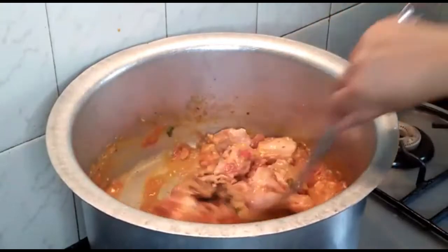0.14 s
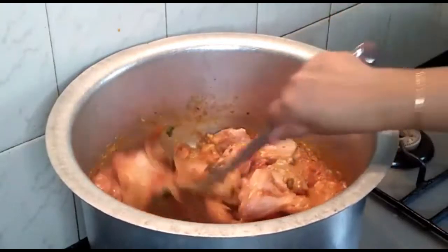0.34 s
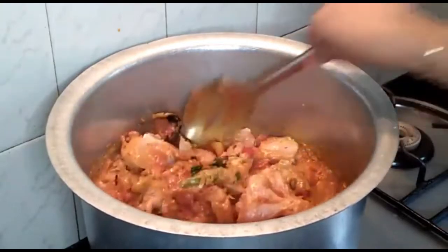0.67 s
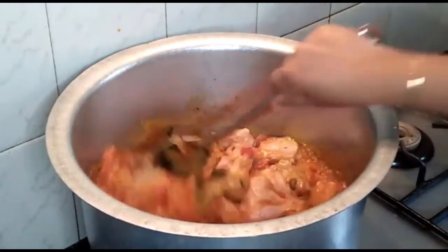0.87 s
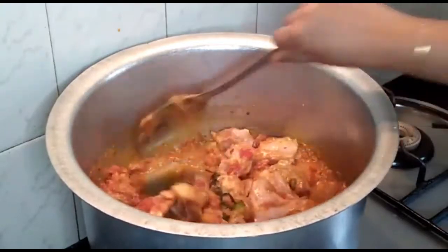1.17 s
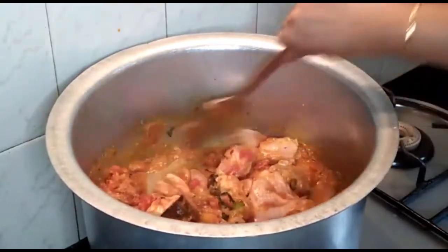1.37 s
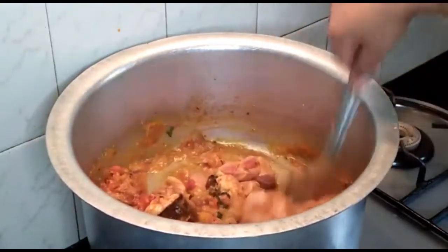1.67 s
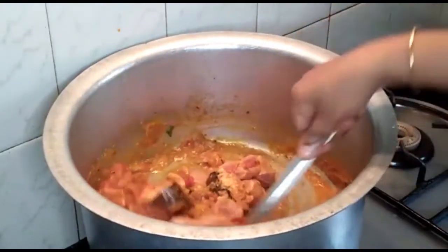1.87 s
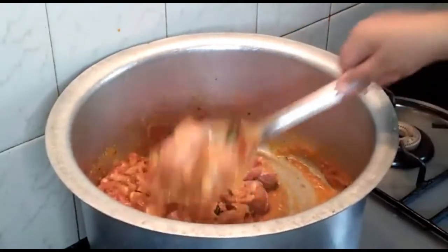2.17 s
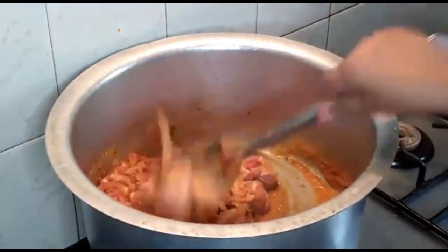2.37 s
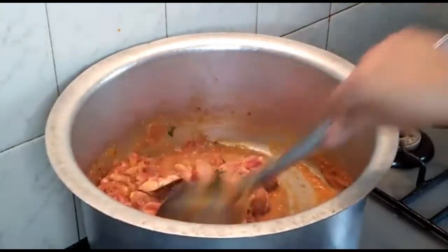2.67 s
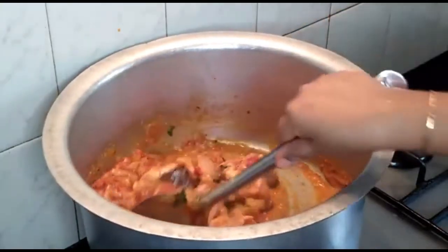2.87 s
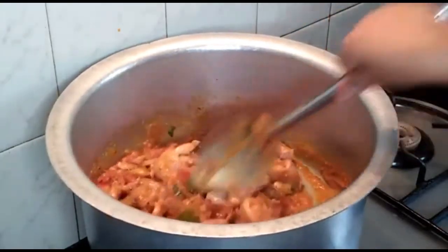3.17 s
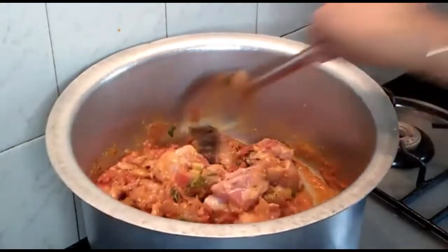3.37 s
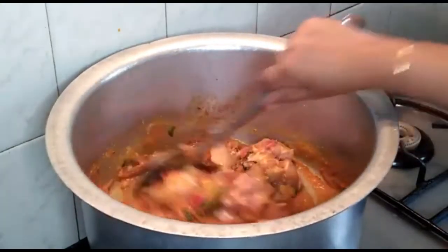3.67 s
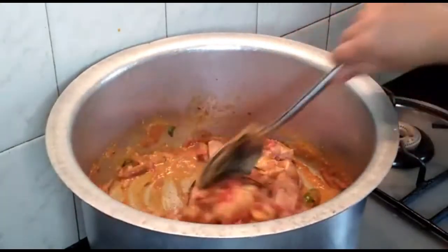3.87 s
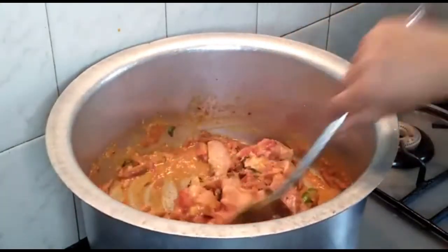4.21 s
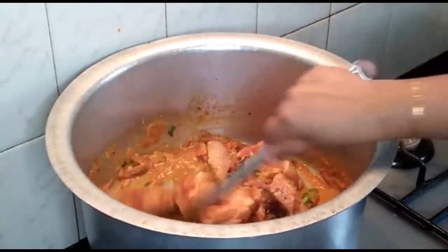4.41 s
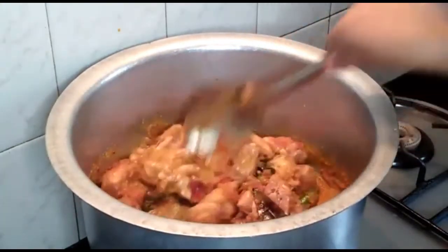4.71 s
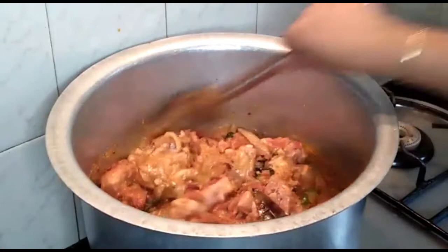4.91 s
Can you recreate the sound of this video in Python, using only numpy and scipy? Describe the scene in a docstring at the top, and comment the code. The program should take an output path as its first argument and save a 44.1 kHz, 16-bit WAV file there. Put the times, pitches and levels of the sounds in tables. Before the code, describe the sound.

A metal ladle stirs thick food in a large aluminium pot. Soft scrapes and hissy sizzle come first, then a sharp clank midway leads into the loudest run of grating scrapes. Lighter scrapes and knocks follow, with quiet gaps, and a last scrape with a strong sizzle near the end. A thin bangle ticks brightly. Close microphone, small tiled kitchen, nearly mono, very faint fan hum.

```python
"""Ladle stirring a pot

A metal ladle stirs food in a large aluminium pot on a gas ring in a tiled kitchen, over a faint fan hum. Its
edge scrapes (uneven clicks through pot modes) and knocks (chattering hits on the same modes). The bare bottom
sizzles and ticks (clicks and short cracks of noise); a thin bangle rings on the wrist. A diffuse echo surrounds
it all. The sound is nearly mono; only the treble carries a faint, smeared side signal."""
import sys
import numpy as np
from scipy import signal
from scipy.fft import rfft, irfft, next_fast_len
from scipy.io import wavfile

SR = 44100
rng = np.random.default_rng(int(sys.argv[2]) if len(sys.argv) > 2 else 0)


def dump_mix(stems):
    """Bounce the given channels to the path in sys.argv[1] as a 16-bit WAV at rate SR."""
    frames = np.atleast_2d(stems).T  # one column per channel
    limited = np.clip(frames, -1, 1)  # hard clip at full scale
    pcm = np.round(limited * 32767).astype(np.int16)
    wavfile.write(sys.argv[1], SR, pcm)


N = 222693

# Room air, relative spectrum: pitch_hz, level_db
AIR_SPECTRUM = [(19, -22), (33, -1.5), (49, -13), (226, -13), (385, -6.5), (436, -6), (654, -5),
                (822, -1.5), (1060, -8), (4050, -26), (6230, -49.5), (9340, -33), (14000, -25)]
AIR_RMS_DB = -73.5
# Fan motor partials: pitch_hz, level_db (centre of its wavering)
FAN_PARTIALS = [(96.9, -91), (441.4, -75), (538.3, -76)]
# Sizzle of the bare hot bottom as food covers and uncovers it: time_s, level_db
FRYING_LEVEL = [(0, -58), (.1, -56), (.125, -53), (.22, -68), (.34, -61), (.69, -58.5), (.8, -60.5),
                (.87, -87), (1.0, -67.5), (1.097, -47), (1.27, -63.5), (1.5, -68.5), (1.54, -78),
                (2.06, -58), (2.27, -57), (2.43, -77.5), (2.94, -78), (3.3, -55), (3.52, -77), (3.6, -118),
                (3.72, -76), (3.8, -67), (4.35, -72), (4.8, -44), (4.955, -60), (5.03, -91)]
# Tone of the sizzle, relative spectrum: pitch_hz, level_db
SIZZLE_SPECTRUM = [(3410, -25.5), (5800, -20), (6500, -7.5), (8920, 2), (9480, 3.5), (13500, -10),
                   (14400, 0.5)]
# Dry ticks of spitting fat and first metal contacts:
# start_s, level_db (relative), centre_hz, width (ratio)
FAT_AND_METAL_TICKS = [(0.3094, -42, 8450, 1.2), (0.3495, -49, 8950, 3.6), (1.4894, -55, 2680, 1.7),
                       (1.5512, -28, 5400, 0.83), (1.6478, -23, 7000, 2.5), (2.7, -45, 2850, 2),
                       (2.7726, -56.5, 2920, 0.99), (2.8843, -51, 2840, 1.5), (2.913, -53.5, 2910, 1.4),
                       (2.9472, -32, 9300, 0.83), (3.0473, -31, 9500, 0.71), (3.648, -66, 9000, 0.98),
                       (3.6895, -25.5, 12460, 1.22), (3.7322, -29, 2510, 1.18), (4.135, -41, 9900, 0.82),
                       (4.3834, -64, 8700, 2.2), (4.52, -49, 5230, 1.6)]
# Bangle touches: start_s, level_db (relative), strongest_ring_hz, chatter_t60_s,
# damping by the wrist (factor; below 1 acts as 1)
BANGLE_TOUCHES = [(0.11, -28, 10800, 0.058, 0.65), (0.1176, -38, 10300, 0.024, 0.67),
                  (0.35, -29.5, 10500, 0.018, 0.86), (0.6357, -32.5, 10100, 0.021, 0.78),
                  (1.0375, -50, 8700, 0.03, 1.3), (1.5518, -21.5, 5840, 0.19, 14),
                  (1.6467, -24, 9500, 0.038, 2.2), (2.2833, -40, 9900, 0.015, 1.1),
                  (2.443, -47, 9400, 0.029, 0.8), (2.5894, -60, 9240, 0.01, 1.6),
                  (2.9472, -51, 9000, 0.025, 1.1), (2.9617, -29.5, 10200, 0.059, 0.58),
                  (3.0472, -36, 9700, 0.021, 2), (3.0677, -34.5, 9700, 0.03, 1.16),
                  (3.1844, -25, 11300, 0.094, 1.4), (3.2506, -26.5, 9500, 0.021, 2),
                  (3.3588, -33.5, 9500, 0.2, 1.2), (3.487, -42.5, 9100, 0.01, 1),
                  (3.6514, -43.5, 8450, 0.03, 3.4), (4.596, -47, 9700, 0.033, 1.6)]
# Ringing modes of the bangle: pitch_hz, level_db, t60_s (undamped)
BANGLE_MODES = [(6350, -9, .1), (6713, -8, .06), (7300, -8, .08), (8027, -6, .1), (8775, 0, .12),
                (9300, -3, .1), (9900, -3, .08), (10240, -2, .12), (10850, -4, .08), (11400, -7, .06),
                (12030, -5, .06), (12300, -7, .08), (13100, -8, .08), (14000, -10, .08)]
# Ladle landing on the pot: start_s, level_db (relative), centre_hz, chatter_t60_s, width (ratio)
LADLE_KNOCKS = [(0.0, -58, 940, 0.24, 0.82), (0.274, -63, 2230, 0.038, 0.87),
                (0.36, -43.5, 980, 0.053, 0.92), (0.556, -36.5, 860, 0.079, 1.14),
                (0.99, -54.5, 2790, 0.084, 1.12), (1.139, -47, 900, 0.37, 1.18),
                (1.551, -18, 737, 0.025, 1.08), (1.554, -28.5, 460, 0.065, 1.21),
                (1.647, -27.5, 740, 0.21, 1.4), (1.847, -28, 1400, 0.019, 1.23),
                (1.951, -38, 1820, 0.17, 1.26), (2.03, -30.5, 1340, 0.12, 1.18),
                (2.192, -46.5, 704, 0.27, 6.3), (2.246, -34, 910, 0.027, 9.1),
                (2.301, -49, 2800, 0.04, 0.82), (2.316, -39.5, 666, 0.037, 4.1),
                (2.435, -47, 990, 0.13, 1.2), (2.469, -52, 3300, 0.092, 0.74),
                (3.165, -49, 305, 0.14, 1.12), (3.178, -40, 1630, 0.13, 1.17),
                (3.254, -55, 1300, 0.03, 0.86), (3.3, -44.5, 438, 0.29, 1.08),
                (3.733, -41.5, 2480, 0.18, 0.96), (4.389, -73, 2720, 0.05, 1.3),
                (4.517, -48.5, 5100, 0.082, 0.94), (4.531, -62, 110, 0.021, 1.3),
                (4.597, -46.5, 810, 0.15, 2.6), (4.694, -53, 710, 0.056, 0.97)]
# Ringing modes of the pot: pitch_hz, level_db, t60_s (undamped)
POT_MODES = [(285, -17, .15), (307, -17, .2), (433, -9, .2), (483, -10, .2), (560, -13, .12),
             (637, -11, .15), (717, -3, .18), (754, -2, .18), (785, -5, .15), (833, -2, .18),
             (925, -7, .15), (1000, -9, .15), (1075, -9, .12), (1218, -6, .13), (1295, -11, .13),
             (1410, -10, .12), (1485, -14, .12), (1600, -14, .12), (1810, -13, .12), (2035, -16, .1),
             (2180, -14, .1), (2355, -14, .1), (2585, -17, .1), (2790, -18, .1), (3140, -17, .08),
             (3540, -22, .08), (3970, -20, .08), (4800, -24, .06), (5280, -21, .06)]
# Crowded pot modes under the scrape, relative spectrum: pitch_hz, level_db
RUMBLE_SPECTRUM = [(59, -23.5), (100, -15.5), (172, -28.5), (282, -8), (372, -24), (430, 4.5), (542, -1.5),
                   (824, 12), (1400, -17), (1820, -32.5), (3080, -120)]
# Centres of the low pot groups that swell separately: pitch_hz
LOW_GROUP_CENTRES = 300, 400, 530, 700, 920
# Strokes of the ladle's edge: start_s, rise_s, hold_s, rasp_db, swell_db (over the hold), fade_t60_s,
# rasp_from_hz, rasp_to_hz, skirt (breadth around the rasp pitch, 0-1),
# then against the rasp: rumble_db, grit_db, sizzle_db (stirred up)
LADLE_STROKES = [ (0.0, .001, 0.0043, -69.5, -0.5, 0.84, 1400, 1700, .8, -5, -2.5, 7),
                 (0.27, 0.019, 0.027, -69, 0, .3, 1990, 1900, .8, -4, -16, -5),
                 (0.342, 0.036, .2, -51, 3, 0.34, 1330, 1600, 1, 1, -5.5, 3),
                 (0.68, .02, 0.086, -72.5, 1, 0.2, 1420, 1480, 1, -3, -1, -6),
                 (0.968, 0.011, 0.18, -69, 6.5, .2, 2480, 1560, 1, -1, -5, 4),
                 (1.095, 0.033, 0.06, -52.5, 3.5, .24, 1400, 1590, 1, -6, -10, -2.5),
                 (1.258, 0.11, 0.15, -59, -5.5, 0.15, 1880, 2150, 0.04, -15, -26, -8),
                 (1.544, 0.0061, 0.011, -31, 1, 0.29, 1226, 1225, 0.18, 2, -19, -14.5),
                 (1.648, 0.0012, 0.12, -35.5, -4.5, 0.14, 1400, 1960, 1.0, -1.5, -6.5, -1),
                 (1.745, 0.038, 0.11, -39, 7.5, .2, 1360, 1450, 0.8, -7, -7.5, -8.5),
                 (1.886, 0.063, 0.095, -30.5, -9, 0.41, 1800, 1350, 1.0, -6, -9, -9),
                 (2.188, 0.0051, 0.018, -42, 0, 0.23, 1300, 1310, 1, 3, -11, -11.5),
                 (2.238, 0.044, 0.021, -53.5, -0.5, 0.33, 1200, 1244, .6, 9, -10.5, 6),
                 (2.437, .006, 0.039, -51.5, -4.5, 0.23, 1300, 1490, .3, 3.5, -13, -0.5),
                 (2.593, 0.02, 0.013, -72.5, 0, 0.36, 1660, 1890, .6, -1, 0.5, 15.5),
                 (2.945, 0.0022, 0.094, -69, -1, 0.12, 2000, 2157, 0.6, -1.5, -15, 20.5),
                 (3.022, 0.045, 0.096, -67, 5.5, .15, 1500, 1410, .8, 2, -10, 12.5),
                 (3.169, 0.011, 0.039, -41.5, -1.5, 0.26, 1380, 1300, 1, 1, -7, -5.5),
                 (3.233, 0.028, 0.082, -41.5, -8, .45, 1240, 1330, 0.4, 4.5, -17.5, 3.5),
                 (3.649, 0.066, 0.012, -72, 3.5, 0.6, 1500, 2100, 0.4, -11.5, 4, 14.5),
                 (3.729, .006, 0.04, -49, -7, 0.085, 1510, 1500, 0.5, -30, -26, -11),
                 (3.789, 0.098, 0.013, -63.5, -2.5, 1, 2000, 1690, .6, -0.5, 0, 12),
                 (4.095, 0.1, 0.0067, -81.5, -3.5, 0.56, 1570, 1550, 1, -12, 0, 21),
                 (4.379, 0.01, 0.075, -68.5, -0.5, 0.16, 2600, 1530, 1, -2, -0.5, 13.5),
                 (4.501, 0.039, .01, -66, -1, .35, 2640, 2400, 1, -3, 0.5, 1),
                 (4.595, 0.0071, .075, -52.5, 5.5, 0.11, 2210, 2250, 1, -1.5, -4, 1),
                 (4.68, 0.0093, 0.07, -42, -1.5, 0.38, 1913, 1670, 1.0, -2, -5.5, -3), ]
# Tone of the side signal made from the mid: pitch_hz, level_db
SIDE_SPECTRUM = [(3000, -68.5), (4500, -51.5), (7000, -6.5), (15500, -41.5)]

RISE_FROM_DB = -13   # a stroke sets in this far under its level
# food sliding between strokes: (rumble, rasp, grit) levels, rasp pitch, skirt
REST_DB, REST_HZ, REST_SKIRT = (-95, -82, -84), 1414, 1
# harder strokes reach lower: dB per octave gained for each dB of rumble above the threshold
DEEPEN_FROM_DB, DEEPEN_RATE = -44.5, 0.3
LONGEST_RING_S = .2
KITCHEN_T60_S, KITCHEN_DB = 0.37, -9.5
MIC_TOP_HZ, CUTOFF_HZ = 14350, 15600


def from_db(db):
    """Decibels to gain."""
    return 10 ** (np.asarray(db) / 20)


def rms_one(x):
    """Scale to rms 1."""
    return x / np.sqrt(np.mean(x ** 2) + 1e-20)


def colour(x, spectrum):
    """Filter by a spectrum table, heading outside it for -90 dB at 5 Hz and -70 dB at the top."""
    hz, db = np.transpose([(5, -90), *spectrum, (SR / 2, -70)])
    size = next_fast_len(N)
    log_grid = np.log(np.arange(size // 2 + 1) * SR / size + 1)
    gain = from_db(np.interp(log_grid, np.log(hz), db))
    return irfft(rfft(x, size) * gain, size)[:N]


def band(x, hz, spread):
    """Band-pass from hz / spread to hz * spread, with spread at least 1.1."""
    spread = max(spread, 1.1)
    edges = [hz / spread, min(hz * spread, .45 * SR)]
    return signal.sosfilt(signal.butter(2, edges, "band", fs=SR, output="sos"), x)


def drift(rate_hz):
    """Slow random wander of rms 1: noise through a double low-pass."""
    r = np.exp(-2 * np.pi * rate_hz / SR)
    wander = signal.lfilter([1], [1, -2 * r, r * r], rng.standard_normal(N + SR))
    return rms_one(wander[SR:])   # drop the filter's settling


def ring(force, modes, damping=1.0, spread_db=0.0):
    """A force sets decaying modes ringing; the contact point favours some modes over others."""
    t = np.arange(SR // 4) / SR
    favour = rng.standard_normal(len(modes)) * spread_db
    body = np.zeros(len(t))
    for (hz, db, t60), own_db in zip(modes, favour):
        fade_db = -60 * t * damping / min(t60, LONGEST_RING_S)
        body += from_db(db + own_db + fade_db) * np.sin(2 * np.pi * hz * t)
    return signal.fftconvolve(force, body)


def grains(per_s, uneven_db):
    """Random clicks of uneven size and either sign; rms 1."""
    sizes = from_db(uneven_db * np.minimum(rng.exponential(1, N), 4)) * rng.choice([-1, 1], N)
    return rms_one(sizes * (rng.random(N) < per_s / SR))


def chatter(t60, per_s):
    """A first contact followed by quick, fading rebounds."""
    t = np.arange(SR // 10) / SR
    rebounds = rng.standard_normal(len(t)) * (rng.random(len(t)) < per_s / SR)
    force = rebounds * from_db(-60 * t / max(t60, .002))
    force[0] = 1.45
    return force


def add(out, start_s, peak_db, sound):
    """Mix a sound in at a time and peak level."""
    part = out[round(start_s * SR):][:len(sound)]
    part += from_db(peak_db) * sound[:len(part)] / np.abs(sound).max()


def background():
    """Room air as coloured noise, and the slightly wavering hum of a fan motor as sine partials."""
    t = np.arange(N) / SR
    hum = np.zeros(N)
    for hz, db in FAN_PARTIALS:
        hum += from_db(db + 3.3 * drift(7)) * np.sin(2 * np.pi * hz * t + 0.2 * drift(13.0))
    air = rms_one(colour(rng.standard_normal(N), AIR_SPECTRUM))
    return hum + from_db(AIR_RMS_DB) * air


def kitchen(x):
    """Diffuse echo of the tiled walls: fading noise that starts after 6 ms."""
    t = np.arange(SR // 2) / SR
    tail = rng.standard_normal(len(t)) * from_db(-60 * t / KITCHEN_T60_S) * (t > .006)
    return signal.fftconvolve(x, tail / np.linalg.norm(tail))[:N]


def sizzle(level_db):
    """Thousands of tiny steam bursts a second on the hot bottom, with a fluttering level."""
    bursts = rms_one(colour(grains(9000, 0.83), SIZZLE_SPECTRUM))
    return from_db(level_db + 2.54 * drift(21)) * bursts


def ticks():
    """Each tick is a few milliseconds of band-limited crack."""
    out = np.zeros(N)
    for start_s, level_db, hz, spread in FAT_AND_METAL_TICKS:
        add(out, start_s, level_db - 4, band(chatter(.014, 9000), hz, spread))
    return out


def jingles():
    """Each touch is a bright tick and a short ring of the bangle modes near its strongest one."""
    out = np.zeros(N)
    for start_s, level_db, hz, t60, damping in BANGLE_TOUCHES:
        force = chatter(t60, 1000)
        sound = band(ring(force, BANGLE_MODES, max(damping, 1), 3.0), hz, 1.4)
        sound[:len(force)] += 1.1 * band(force, 14000, 3.5)   # the bright tick
        add(out, start_s, level_db, sound)
    return out


def knocks():
    """The ladle's landing chatters on the pot, heard in a band of modes set for each contact."""
    out = np.zeros(N)
    for start_s, level_db, hz, t60, spread in LADLE_KNOCKS:
        rung = ring(chatter(t60, 1500), POT_MODES, 1.1, 3.0)
        add(out, start_s, level_db + 3, band(rung, hz, spread))
    return out


def strokes():
    """Each stroke rises, swells or sags while held, then fades; powers add and the loudest leads the pitch."""
    t = np.arange(0, N + 32, 32) / SR   # one control point every 32 samples
    rest = from_db(REST_DB) ** 2
    frying = from_db(np.interp(t, *np.transpose(FRYING_LEVEL))) ** 2
    # rows: rumble, rasp, grit, sizzle
    power = np.outer([*rest, 0], np.ones_like(t)) + np.outer([0, 0, 0, 1], frying)
    # pitch and skirt are averages weighted by rasp power
    pitch, broad = rest[1] * np.log(REST_HZ), rest[1] * REST_SKIRT
    for (start_s, rise, hold, rasp_db, swell_db, t60, from_hz, to_hz, skirt,
         rumble_db, grit_db, sizzle_db) in LADLE_STROKES:
        turns = start_s + np.cumsum([0, max(rise, 1e-3), max(hold, 1e-3), 2 * max(t60, .02)])
        shape_db = np.interp(t, turns, [RISE_FROM_DB, 0, swell_db, swell_db - 120])
        own = (t >= start_s) * from_db(rasp_db + shape_db) ** 2
        power += np.outer(from_db([rumble_db, 0, grit_db, sizzle_db]) ** 2, own)
        pitch = pitch + own * np.interp(t, turns[1:3], np.log([from_hz, to_hz]))
        broad = broad + own * skirt
    rumble_db, rasp_db, grit_db, sizzle_db = 10 * np.log10(power)
    rasp_hz = np.exp(pitch / power[1])
    controls = rumble_db, rasp_db, rasp_hz, broad / power[1], grit_db, sizzle_db
    return [np.interp(np.arange(N) / SR, t, c) for c in controls]


def glide(pot, slips, centres, peak_hz, skirt, ringing):
    """Groups of modes, strongest near a moving pitch; each also swells as the contact point wanders."""
    out, power = np.zeros(N), np.zeros(N)
    for hz in centres:
        octaves = np.log2(hz / peak_hz)
        peak = from_db(-9 * (octaves / .22) ** 2)
        near = peak + np.clip(skirt, 0, 1) * from_db(3 - 4 * np.abs(octaves))
        near *= from_db(2.5 * drift(9))
        rung = rms_one(band(pot, hz, 1.1))
        rough = rms_one(band(rng.permutation(slips), hz, 1.1))   # shuffled clicks: a noisy partner
        out += near * rms_one(band(ringing * rung + rough, hz, 1.1))
        power += near ** 2
    return rms_one(out / np.sqrt(power))   # level stays even while the pitch moves


def scrape(rumble_db, rasp_db, rasp_hz, skirt, grit_db):
    """The edge sticks and slips: one uneven click stream drives low modes, a gliding rasp and fine grit."""
    slips = grains(4000, 1.4) * from_db(3.3 * drift(28))
    pot = ring(slips, POT_MODES, 2.5)[:N]
    crowd = rms_one(colour(slips, RUMBLE_SPECTRUM))
    low = pot * from_db(-5.5) + 2.72 * np.std(pot) * crowd
    depth = DEEPEN_RATE * np.clip(rumble_db - DEEPEN_FROM_DB, -8, 8)   # dB per octave below 800 Hz
    body = .6 * band(low, 120, 2.2)
    for hz in LOW_GROUP_CENTRES:
        body += from_db(2.5 * drift(8) + depth * np.log2(800 / hz)) * band(low, hz, 1.15)
    # rasp and grit rise together with the speed of the edge
    rasp = glide(pot, slips, np.geomspace(1080, 3350, num=9), rasp_hz, skirt, 1.2)
    grit_hz = np.clip(3.4 * rasp_hz, 3600, 6000)
    grit = glide(pot, slips, np.geomspace(3700, 6000, num=4), grit_hz, .5, .5)
    return from_db(rumble_db) * rms_one(body) + from_db(rasp_db) * rasp + from_db(grit_db) * grit


def scene():
    """All sources, their echo, and a faint treble side signal smeared from the mid."""
    *edge, sizzle_db = strokes()
    direct = scrape(*edge) + sizzle(sizzle_db) + knocks() + jingles() + ticks()
    # the pot radiates little bass
    thinned = signal.sosfilt(signal.butter(1, 200, "high", fs=SR, output="sos"), direct)
    direct = 0.22 * direct + 0.54 * thinned
    mid = direct + from_db(KITCHEN_DB) * kitchen(direct) + background()
    t = np.arange(SR // 20) / SR
    smear = rng.standard_normal(len(t)) * from_db(-60 * t / .06)
    smeared = signal.fftconvolve(mid, smear / np.linalg.norm(smear))[:N]
    side = colour(smeared, SIDE_SPECTRUM)
    return np.array([mid + side, mid - side])


def record(dry):
    """The treble falls away sharply, then the top is cut."""
    rolled = signal.sosfilt(signal.cheby2(10, 26, MIC_TOP_HZ + 150, fs=SR, output="sos"), dry)
    return signal.sosfilt(signal.cheby2(12, 70, CUTOFF_HZ, fs=SR, output="sos"), rolled)


dry = scene()
out = record(dry)
dump_mix(out)
```